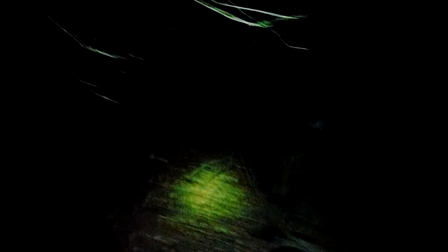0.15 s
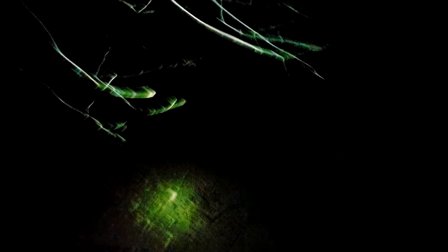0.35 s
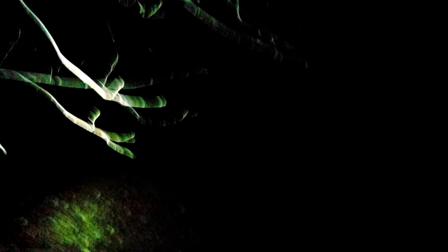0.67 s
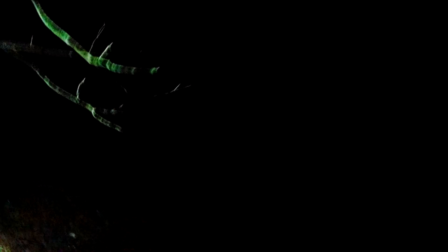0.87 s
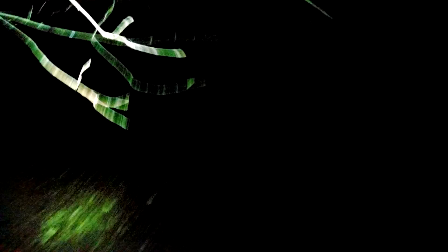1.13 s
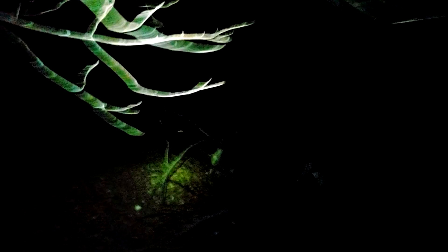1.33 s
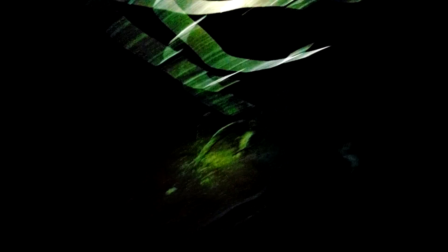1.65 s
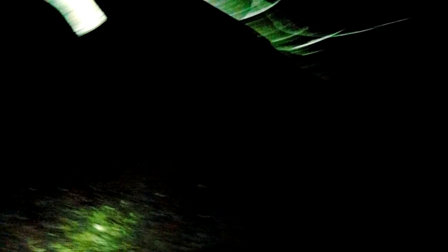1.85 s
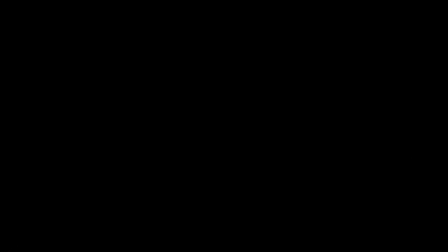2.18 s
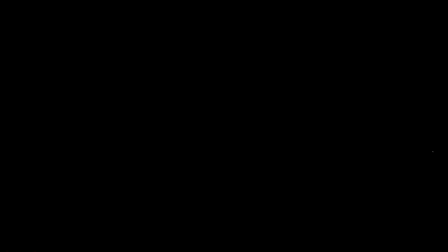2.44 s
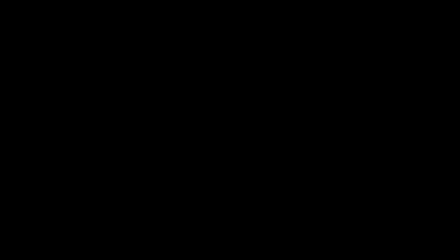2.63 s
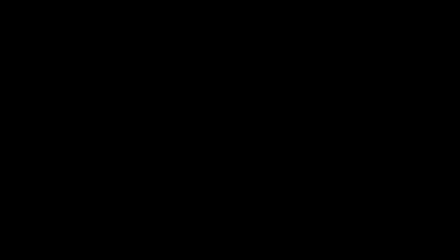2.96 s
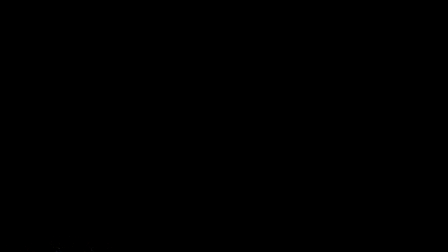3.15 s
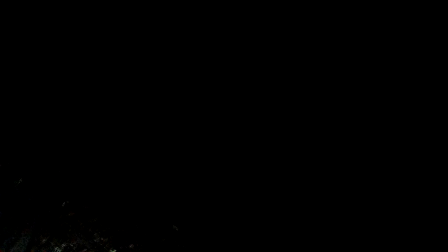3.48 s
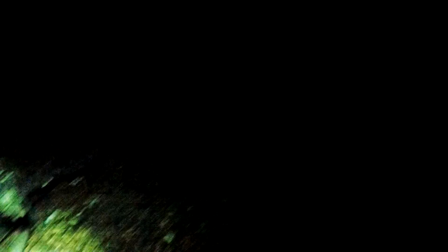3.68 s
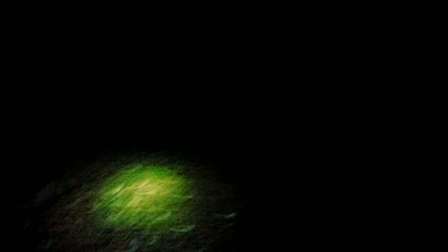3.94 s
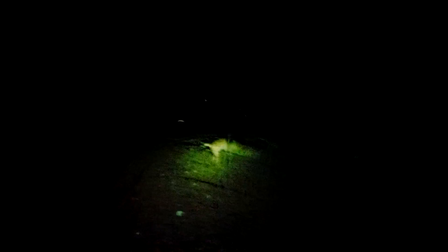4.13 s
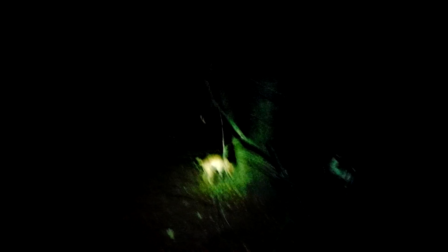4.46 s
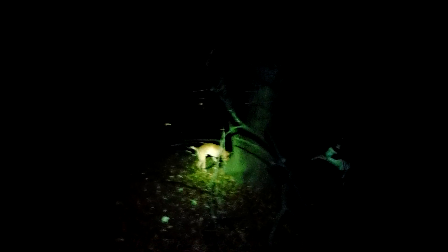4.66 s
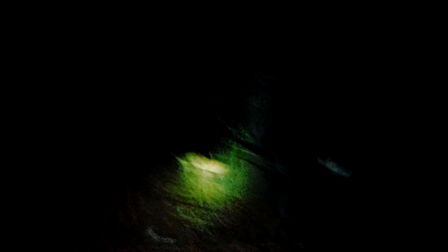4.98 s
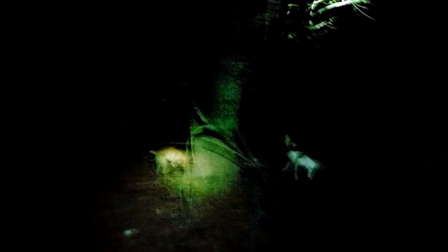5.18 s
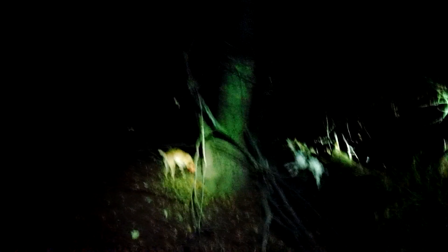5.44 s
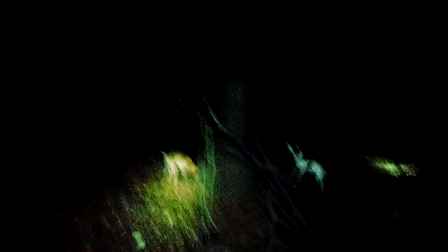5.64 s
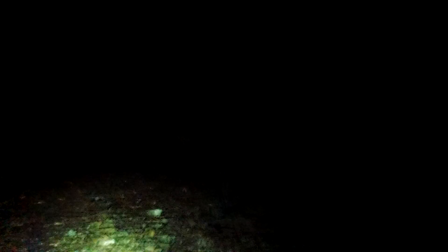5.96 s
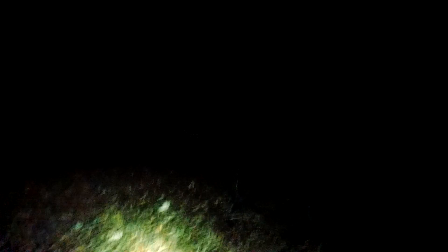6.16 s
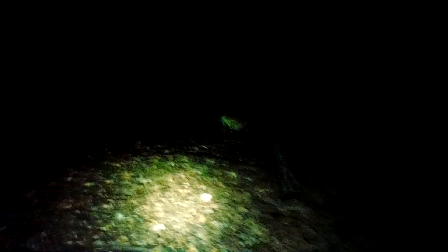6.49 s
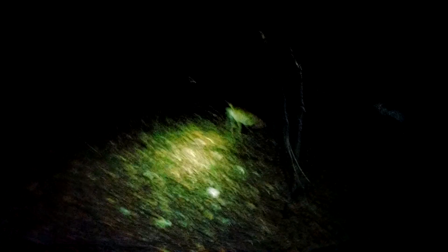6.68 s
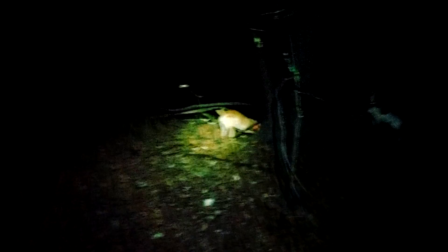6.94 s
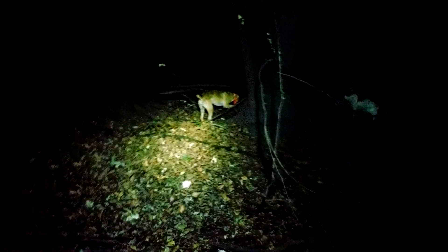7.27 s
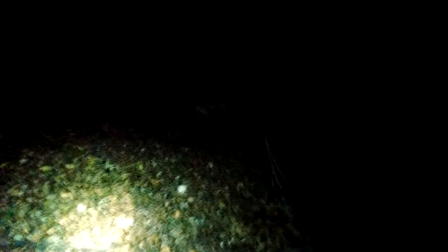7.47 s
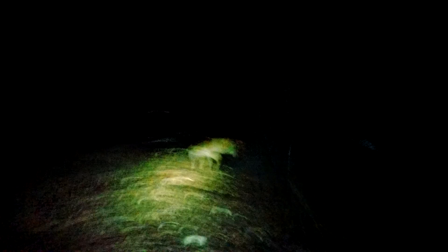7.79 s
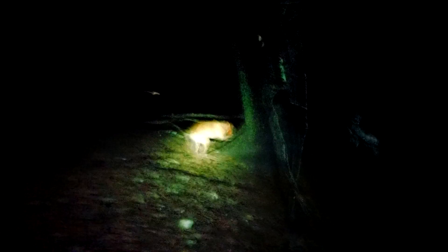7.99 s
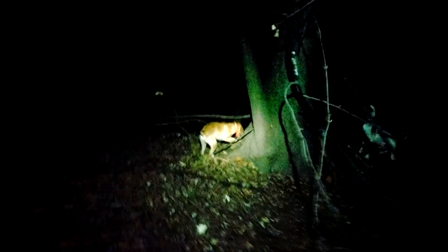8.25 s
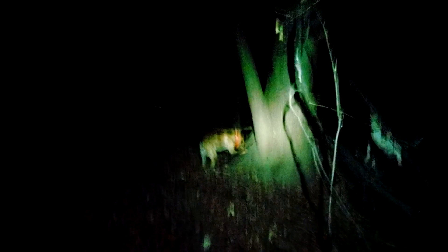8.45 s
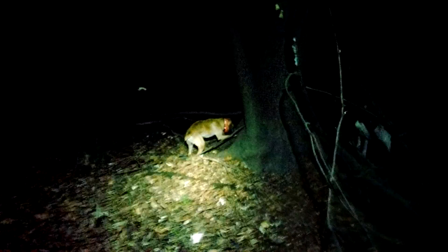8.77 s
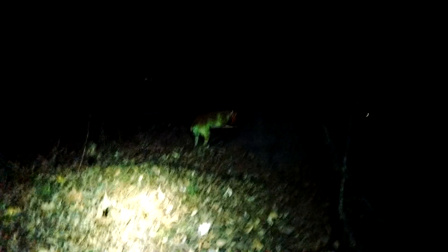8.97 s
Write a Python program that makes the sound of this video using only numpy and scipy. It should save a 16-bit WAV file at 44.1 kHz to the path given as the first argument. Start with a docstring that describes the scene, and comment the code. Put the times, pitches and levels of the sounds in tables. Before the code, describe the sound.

Rattling drawn-out dog howls and cracking yelps echo faintly among trees as close footsteps crunch dry leaves and twigs snap.

```python
"""Two hounds in a wood at night

Two hounds bay: hoarse barks, long throaty howls that break into a rattle at a third of the pitch, clear yelps.
The voices are sums of gliding partials plus breath noise; the trees echo them as a decaying noise tail.
Close by, whoever carries the two microphones wades through dry leaves (crackling noise). There are short clicks,
some of them twigs (a sharp noise burst over a duller knock). The moving microphones thud softly, and three tiny
squeaks sound among the leaves."""
import sys
import numpy as np
from scipy import signal
from scipy.fft import rfft, irfft, next_fast_len
from scipy.io import wavfile
from scipy.ndimage import map_coordinates

SR = 44100
rng = np.random.default_rng(int(sys.argv[2]) if len(sys.argv) > 2 else 0)


def int16_out(signal):
    """Quantize to a 16-bit WAV file."""
    q = np.round(np.clip(np.atleast_2d(signal).T, -1, 1) * 32767)
    wavfile.write(sys.argv[1], SR, q.astype(np.int16))


N = 402191  # samples

# Hoarse barks. Each row: start in [s], length in [s], loudest moment as a share of the length, pitch at start
# and at end in [Hz], level in [dB], fall after the loudest moment in [dB], upper band over the lower in [dB],
# mouth resonance in [Hz], rattle at the start in [dB].
BARK_ROWS = [(0.0, 0.11, 0.053, 332.7, 380, 3.5, 31, -8.5, 675, 4),
             (.783, 0.24, 0.17, 386.5, 302.5, -12, 9.8, -3, 600, 0),
             (1.381, 0.22, 0.2, 330.8, 361, -11.5, 16, -5, 646, 1),
             (3.027, .2, 0.5, 378.3, 335, -13.5, 11, -1.5, 525, -1),
             (7.548, 0.22, 0.36, 354.8, 339.5, -9, 11, -4, 760, 5.5),
             (9.03, 0.16, 0.087, 391, 313, -9, 4.6, -3, 585, 2)]
# Long howls, one list each. Each row: time in [s], pitch in [Hz], level under about 1 kHz in [dB], upper band
# over the lower in [dB], mouth resonance in [Hz], rattle at a third of the pitch in [dB], roughness [0-1].
HOWL_TRACKS = [
    [(1.77, 310.2, -14.5, -13, 600, -12, 0.7), (1.888, 299, -14.5, -11, 620, -11, 0.8),
     (2.074, 339.6, -12.5, -14, 660, -17, 0.5), (2.16, 345.5, -26.5, -15, 700, -4, 0.4),
     (2.25, 350.2, -23, -12, 800, 2.5, 0.57), (2.3, 360.5, -25.5, -7, 490, -7, 0.56),
     (2.36, 365, -23.5, -17.5, 470, 5, 0.22), (2.44, 359.7, -22, -14.5, 470, 0.5, 0.56),
     (2.55, 351, -26.5, -7, 480, -9, 0.6), (2.59, 343, -26, -8.5, 690, -2, 0.8),
     (2.63, 341.6, -27, -12, 643, 7, 0.62), (2.69, 338, -10, -13, 533, 15, 0.4)],
    [(3.22, 253.6, -33.5, -21, 510, 10, 0.7), (3.418, 273.3, -20, -18.5, 575, -31.5, 0),
     (3.532, 305.2, -25, -1, 835, -15, 0.1), (3.6, 312, -16.5, -3.5, 745, -7.5, 0.38),
     (3.74, 342, -11.5, -14.5, 620, -5, 0.85), (3.77, 348.3, -8, -18.5, 510, 0, 0),
     (3.88, 365, -10.5, -10, 454, -4, 0.35), (3.954, 353.3, -17.5, -1.5, 790, -8.5, 0.65),
     (4.0, 313, -36, -27, 495, 35.5, 0.9)],
    [(4.35, 359.6, -10, -8, 691, -5, 0.8), (4.375, 354, -19, 1, 705, 18.5, 0.8),
     (4.39, 340.7, -5.5, -12.5, 745, -17, 0.4), (4.402, 349.6, -13, -15.5, 740, -8.5, 0.44),
     (4.5, 314, -15.5, -13, 620, -1.5, 0.7), (4.6, 306.8, -18, -12.5, 603, -15, 0.37),
     (4.69, 297.6, -20.5, -11, 666, -20.5, 0.7), (4.714, 302, -16, -12.5, 627, -5, 0.7),
     (4.74, 292, -20.5, -12.5, 680, -37, 0.65), (4.858, 289.6, -15.5, -16.5, 730, -36, 0.23),
     (4.94, 287.3, -14, -24, 841, -40, 0), (5.04, 296.7, -17.5, -8.5, 840, -30, 0.3),
     (5.08, 318, -14, -11.5, 650, -3, 0.74), (5.196, 333.3, -12.5, -11, 720, -5, 0.8),
     (5.3, 338.7, -13, -10, 716, 0, 0.65), (5.4, 337.6, -12, -9.5, 753, 0.5, 0.8),
     (5.52, 346.7, -15.5, -6.5, 777.7, -11, 0.76), (5.628, 353.3, -11.5, -4.5, 760, 6.5, 0.8),
     (5.67, 345.2, -9, -12, 672.6, -8, 0.83), (5.683, 338.2, -23, -2.5, 600, 10, 0.9),
     (5.7, 330.3, -8, -10.5, 573, 14, 0.87), (5.745, 318, 3, -5, 594, 0, 1)],
    [(6.108, 352, -16.5, -3, 670, 2, 0.6), (6.16, 357.2, -16.5, -1, 700, 3.5, 0.8),
     (6.23, 344.2, -14.5, -10.5, 650, 3.5, 0.45), (6.332, 341.3, -16, -13, 600, 4, 0.7),
     (6.436, 336.5, -14, -10.5, 700, 9, 0.78), (6.65, 341, -12, -14.5, 650, 4, 0.72),
     (6.78, 342.8, -12.5, -14.5, 674, 3.5, 0.6), (6.9, 341.8, -14.5, -9.5, 670, 3, 0.56),
     (6.98, 340.8, -12.5, -9, 658, 6.5, 0.38), (7.07, 335.7, -11, -7, 646, 5, 0.79),
     (7.12, 347.6, -13, -9, 650, 7, 0.77), (7.165, 374.7, -23, 0, 510, 0.5, 0.33),
     (7.2, 364, -32, 6, 518, 7, .7)],
]
# Lowest voice partial, howl by howl, in [dB], before the rattle shifts it.
HOWL_FUNDAMENTAL_DB = [-7.5, -5, -2, 0.5]
# Colour of the throat. Each row: frequency in [Hz], gain in [dB].
THROAT_GAIN = [(100, -53.5), (250, -14.5), (330, -4.5), (490, -1), (620, -3.5), (790, 1), (930, -8.5),
               (1080, -3), (1270, -3.5), (1470, -11), (1700, -12.5), (1900, -19.5), (2300, -37)]
# Resonances rung by the breath; the first two form the lower band. Each row: centre in [Hz], width in [Hz],
# gain within its band in [dB].
BREATH_RESONANCES = [(510, 37.6, 0.5), (800, 150, -2.5), (1095, 170, -2), (1478, 100, -3),
                     (1780, 100, -9.5)]
# Echo among the trunks. Each row: frequency in [Hz], time to die by 60 dB in [s].
WOOD_DECAY = [(200, 1.3), (700, 1.32), (1500, 0.76), (3000, 7.6)]
# The dogs between the two microphones. Each row: frequency in [Hz], left minus right in [dB].
DOG_BALANCE = [(250, -4.5), (550, -4.5), (900, -3), (1600, 4.5)]
# Faint rustle between strides. Each row: time in [s], level in [dB] before the balance of the microphones.
STIR_LEVEL = [(0, -39.5), (1, -38.5), (4.2, -41.5), (4.6, -46.5), (4.9, -37), (6.4, -41.5), (7.4, -44.5),
              (8.55, -43.5), (8.94, -51.5), (9.12, -43.5)]
# Strides through the leaves. Each row: start in [s], length in [s], level in [dB] before the balance of the
# microphones, sag by the end in [dB] (negative grows).
STRIDE_ROWS = [(0.073, 0.15, -23.5, 1.5), (0.155, 0.5, -20, 18), (0.546, 0.3, -36, -8),
               (0.99, 0.2, -25.5, 20), (1.17, 0.38, -25, 15.5), (1.859, 0.31, -19, 9.5),
               (2.505, 0.25, -30.5, 7.5), (2.816, 0.11, -21, 23.5), (3.04, 0.13, -29.5, 15),
               (3.175, 0.31, -33.5, 13), (3.317, 0.22, -22.5, 16), (3.5, 0.11, -28, 9),
               (3.914, 0.28, -22, 12), (4.812, 0.061, -29, 3), (4.894, 0.24, -16.5, 15),
               (5.35, 0.31, -33.5, 15), (5.725, 0.82, -31, 27), (5.931, 0.21, -28, -1.5),
               (6.526, 0.36, -26, 12.5), (7.473, 0.27, -30.5, 12.5), (7.718, 0.16, -23.5, 15),
               (7.883, 0.13, -35.5, -1), (8.12, 0.061, -31, -1), (8.19, 0.033, -29, 10),
               (8.248, 0.092, -20, 20), (8.319, 0.27, -23.5, 16), (8.983, 0.23, -32, 6)]
# Relative spectrum of the close, crisp rustle. Each row: frequency in [Hz], density in [dB per Hz].
CRISP_SPECTRUM = [(40, -22.5), (150, -35), (400, -10), (1500, -7.5), (2600, -3.5), (4000, -5.5),
                  (8000, -7.5), (11500, -2), (15000, -4.5)]
# Relative spectrum of the rustle alike on both sides. Each row: frequency in [Hz], density in [dB per Hz].
SHARED_SPECTRUM = [(40, -16.5), (200, -6), (500, 2.5), (1500, -2.5), (2500, -33), (4000, -9.5), (7000, -3),
                   (15000, -23)]
# Thuds of the handled microphones. Each row: time in [s], rumble in [dB] before its wobble and side gains.
HANDLING_LEVEL = [(0.0, -57), (1.04, -60), (6.168, -56.5), (6.249, -66), (7.699, -61.5), (8.5, -63),
                  (8.89, -78), (9.12, -51)]
# Short clicks, some of them twigs. Each row: time in [s], nominal level of the sharp burst in [dB], knock
# relative to it in [dB] before filtering.
CLICK_ROWS = [(0.235, -5, -29), (0.5837, -8.5, -10), (0.958, -20, -17), (1.021, -13, -26),
              (1.102, -16, -25), (2.094, 5, -30), (2.1276, 3.5, -27), (2.148, 1.5, -34), (2.783, -17, -19),
              (3.1804, -18.5, -17), (3.214, -13, -25), (3.423, -5.5, -13), (4.1846, -8, -32),
              (4.8313, -23, -17), (5.386, -12.5, -11), (5.4066, -25, 6), (5.664, -17.5, -18),
              (6.659, -6.5, -26), (7.099, -17.5, -20), (7.47, -19, -6), (7.9033, -37, 13),
              (7.9483, -17, -3), (8.03, -17.5, -11), (8.137, -21, -5), (8.204, -27.5, 8.5),
              (8.267, -8.5, -11), (8.275, -14, -5), (8.293, -20, -8), (8.36, -12.5, -25), (8.4158, 6, -35),
              (8.4726, -29, 4), (8.51, -8.5, -21), (8.544, -11.5, -8), (8.7784, -27.5, 0),
              (8.86, -40.5, 12), (8.941, -41, 4), (8.981, -21.5, 2), (9.0117, -18, -3)]
# Clear yelps. Each row: loudest moment in [s], rise in [s], fall in [s], pitch at start, loudest moment and end
# in [Hz], level of the first partial in [dB], swell in [dB], fade in [dB], second and third partial over the
# first in [dB], depth of the hoarse flutter in [dB].
YELP_ROWS = [(.785, 0.049, 0.029, 346, 628.5, 550, -5, 43, 17, -8.5, -29, -24),
             (1.375, 0.031, 0.1, 378, 414.7, 360, -20.5, 6, 4.9, 2, -11, -33),
             (1.62, 0.12, 0.091, 351.7, 366, 393, -30, 14, 2.4, 2, 0, -11.5),
             (1.766, 0.095, 0.053, 379, 466.6, 457, -13.5, 11, 12, -18, -11.5, -20),
             (2.0, 0.054, 0.027, 333, 429.7, 433, -23, 8.6, 6, 7.5, 2, -28),
             (2.045, .03, 0.052, 430.6, 428, 350, -14.5, 8, 33, -8, -4.5, -29),
             (2.645, .03, 0.019, 581, 517, 493, -18, 28, 23, 0, -31, -18),
             (2.889, 0.043, 0.07, 337, 417, 368, -30, 15, 15, 13, -18.5, -15.5),
             (2.965, 0.026, 0.027, 408, 450, 450, -22.5, 12, 32, -19, -34, -13),
             (3.045, 0.056, 0.013, 415, 650, 680, -13.5, 26, 17, 2, -32, -8),
             (3.519, 0.066, 0.068, 371, 446.4, 330, -23, 13, 11, 9.5, -10, -18),
             (3.958, 0.032, 0.042, 465, 448, 300, -16, 14, 31, -10.5, -17.5, -9.5),
             (4.316, 0.053, 0.048, 346, 433, 409, -21.5, 12.7, 3.7, 6.5, 0, -17),
             (4.385, 0.038, 0.019, 430, 553.4, 600, -15, 7.3, 22, 0.5, -22.5, -10),
             (5.757, .022, 0.022, 643, 617, 517, -20.5, 5.1, 15, 1, -13, -7),
             (6.108, 0.048, 0.02, 416, 585, 640, -7.5, 27, 6.9, 5, -18, -16),
             (7.158, 0.041, 0.033, 575, 546, 380, -12, 21, 21, -7, -50, -10.5),
             (7.2, .02, 0.039, 215, 178, 95, -51, 8, 10, -26.5, -45.5, -8),
             (7.552, 0.021, 0.018, 506, 537, 650, -7.5, 21, 13, -4, -16.5, -20),
             (7.752, 0.019, 0.036, 588, 490, 395, -13, 9.3, 21, -7, -11, -12),
             (9.025, 0.036, 0.034, 767, 675, 542, -10, 22, 11, -22, -26, -19)]
# Lines between the partials of a cracked yelp: the lower and the upper, in multiples of the pitch.
CRACK_RATIOS = (1.6, 2.5)
# Tiny squeaks among the leaves. Each row: time in [s], peak in [dB].
SQUEAKS = [(8.04, -37.5), (8.27, -33), (8.75, -47)]

BAND_SPLIT_HZ = 1050  # between the lower and upper band of a voice
UPPER_MOUTH = 4.48  # second mouth resonance, in multiples of the pitch
FUNDAMENTAL_PER_DB = 0.14  # dB on the lowest voice partial per dB of rattle
UPPER_RATTLE_DB = -5  # the rattle is weaker in the upper band
DOUBLING = .12  # extra strength of every other rattle in a rough voice
HOARSE_SHARE = .45  # share of power that is breath in the roughest, rattling voice
BARK_SWELL_DB, BARK_SWELL_BEND = 32, 2.2  # swell if it took a whole length, and its curve
BARK_FALL_BEND, BARK_RELEASE_DB = 0.45, 3  # the fall is quick at first; breath gives out late
BARK_DULLS_DB, BARK_RATTLE_LOSS_DB = 10.5, 7  # upper band and rattle lost by the end
BARK_ROUGH, BARK_CLEARS = 1, 0.46  # roughness at the start (0-1), share of it lost by the end
BARK_FUNDAMENTAL_DB = 0.5
STRIDE_RISE_S, STRIDE_STOP_S = 0.068, 0.045
BIGGEST_CRACK = 6.5  # leaf crack, in steps of the cracks' dB spread
APART_DB = -14.5  # rustle that differs on the two microphones
PORT_LAG_S = 17.3 / SR  # close rustle reaches the left microphone this much later
FOURTH_DB = -6.5  # fourth yelp partial against the second, before the throat
GLIDE_BEND, SWELL_BEND, FADE_BEND = 1.6, 1.5, 1.96  # curves of arched pitch and level
CRACK_RISING_HZ, CRACK_FALLING_HZ = 510, 650  # a gliding yelp cracks above, or below, this pitch
CRACK_DB = -7  # the lower line between the partials
CHIRP_HZ, CHIRP_S = 3200, .006  # pitch, and time from the peak to 1/e
TOP_HZ = 15700  # band limit


def amp(db):
    """Gain of a level in dB."""
    return 10 ** (np.asarray(db) / 20)


def unit(x):
    """x at an RMS of one."""
    return x / np.sqrt(np.mean(x ** 2) + 1e-20)


def along(points, hz):
    """Value at hz between (Hz, value) points on a log axis."""
    f, v = np.transpose(points)
    return np.interp(np.log(hz + 1), np.log(f + 1), v)


def wobble(rate, size, count=1):
    """Smooth random curves of size samples, rate knots a second."""
    knots = rng.standard_normal((count, int(size * rate / SR) + 4))
    return np.array([map_coordinates(k, [np.arange(size) * rate / SR], order=2) for k in knots])


def filtered(x, response):
    """x times a complex response of frequency."""
    m = next_fast_len(N + SR // 2)
    return irfft(rfft(x, m) * response(np.fft.rfftfreq(m, 1 / SR)), m)[..., :N]


def call(rows, rise, fall):
    """Start sample, times, soft ends and the interpolated columns of one call."""
    s, *cols = np.transpose(rows)
    start = round(s[0] * SR)
    t = np.arange(start, min(round(s[-1] * SR), N)) / SR
    ends = np.clip(np.minimum((t - s[0]) / rise, (s[-1] - t) / fall), 0, 1)
    return start, t, ends ** 2, [np.interp(t, s, c) for c in cols]


def barks():
    """A bark bursts out, dies away fast at first, and grows duller and less rough, in the columns of a howl."""
    tracks = []
    u = np.linspace(0, 1, 15)  # share of the length
    for s, length, top, hz0, hz1, db, loss_db, upper_db, mouth_hz, rattle_db in BARK_ROWS:
        swell_db = BARK_SWELL_DB * np.maximum(top - u, 0) ** BARK_SWELL_BEND
        fall_db = loss_db * np.maximum((u - top) / (1 - top), 0) ** BARK_FALL_BEND
        tracks.append(np.column_stack([
            s + u * length,
            hz0 + (hz1 - hz0) * u ** 3,
            db - swell_db - fall_db - BARK_RELEASE_DB * u ** 5,
            upper_db - BARK_DULLS_DB * u,
            np.full(len(u), mouth_hz),
            rattle_db - BARK_RATTLE_LOSS_DB * u,
            BARK_ROUGH * (1 - BARK_CLEARS * u),
            np.full(len(u), BARK_FUNDAMENTAL_DB)]))
    return tracks


def howls():
    """A howl's lowest voice partial is weaker while the folds do not rattle; it is added as a last column."""
    return [[(*row, db + FUNDAMENTAL_PER_DB * row[-2]) for row in rows]
            for rows, db in zip(HOWL_TRACKS, HOWL_FUNDAMENTAL_DB)]


def breath(gains):
    """Noise rings the throat's resonances in a lower and an upper band, each on its own gain."""
    def rings(hz):
        parts = BREATH_RESONANCES[:2], BREATH_RESONANCES[2:]
        return np.array([sum(amp(db) / (1 + ((hz - centre) * 2 / width) ** 2) for centre, width, db in part)
                         for part in parts])

    low, high = filtered(rng.standard_normal((2, N)), rings)
    return unit(low) * gains[0] + unit(high) * gains[1]


def bays():
    """Partials of a third of the pitch: every third is the voice, the others rise when the folds rattle."""
    out, gains = np.zeros(N), np.zeros((2, N))
    k = np.arange(1, 21)[:, None]
    voice, fundamental = k % 3 == 0, k == 3
    for rows in barks() + howls():
        start, t, ends, columns = call(rows, rise=.02, fall=.05)
        pitch, db, upper_db, first_hz, rattle_db, roughness, low_db = columns
        rough, second_hz = np.clip(roughness, 0, 1), UPPER_MOUTH * pitch
        jitter = (.002 + .006 * rough) * wobble(45, len(t))[0] + .006 * wobble(18, len(t))[0]
        hz = k * pitch / 3 * (1 + jitter)
        low = hz < BAND_SPLIT_HZ

        size_db = along(THROAT_GAIN, hz) + ~voice * (rattle_db + UPPER_RATTLE_DB * ~low)
        size_db = size_db - 22 * (k < 3) + low_db * fundamental
        # the throat never holds still
        size_db = size_db + np.where(fundamental, 2, 4.5) * np.tanh(wobble(16, len(t), count=20))
        first_ring = 3 / (1 + ((hz - first_hz) / 85) ** 2)
        second_ring = 3 / (1 + ((hz - second_hz) / 130) ** 2)
        size = amp(size_db) * (1 + first_ring + second_ring)
        low_rms = np.sqrt(np.sum(low * size ** 2, axis=0) / 2)
        high_rms = np.sqrt(np.sum(~low * size ** 2, axis=0) / 2)
        size = np.where(low, size / low_rms, size / high_rms * amp(upper_db))

        # uneven cycles smear the rattle and the high partials most; the fundamental stays steady
        smear = rough * np.where(fundamental, .05, np.where(voice, .4, .75)) * (hz / 650) ** .3
        shake, sway = 1.5 * np.tanh(wobble(90, len(t), count=40) / 1.5).reshape(2, 20, -1)
        # partials lag around each resonance, and each drifts loosely in phase
        lag = np.arctan((hz - first_hz) / 200) + np.arctan((hz - second_hz) / 250)
        lag = lag + 1.6 * wobble(4, len(t), count=20)
        turn = 2 * np.pi * np.cumsum(hz, axis=1) / SR - lag
        # in a rough voice every other rattle is stronger, now more, now less
        doubling = DOUBLING * rough * (1 + np.tanh(wobble(6, len(t))[0]))
        puffs = 1 + doubling * np.cos(turn[0] / 2 - hz / 160)
        size = size * np.where(fundamental, 1, puffs)
        wave = amp(4.5 * smear * shake) * np.sin(turn + 1.5 * smear * sway)

        noisy = HOARSE_SHARE * rough ** 3 * np.clip(amp(rattle_db), 0, 1)  # share of power
        level = amp(db) * ends
        out[start:][:len(t)] += level * np.sqrt(1 - noisy) * np.sum(size * wave, axis=0)
        gains[:, start:][:, :len(t)] += level * np.sqrt(noisy) * amp([0 * t, upper_db])
    return out + breath(gains)


def wood(x):
    """Trunks scatter the voices into a late noise tail; each frequency dies at its own speed."""
    hz, t, z = signal.stft(rng.standard_normal((2, SR)), SR, nperseg=256)
    decay_db = -60 * t / along(WOOD_DECAY, hz)[:, None]
    z = z * amp(decay_db + 1.6 * rng.standard_normal(len(t)))
    tail = signal.istft(z, SR, nperseg=256)[1]
    tail[1] = 0.75 * tail[0] + 0.73 * tail[1]  # the two sides are partly alike
    late = np.pad(x, (1500, 0))[None]  # samples before the first echo
    return signal.fftconvolve(late, tail / np.linalg.norm(tail[0]), axes=1)[:, :N]


def wading():
    """Gain of the rustle: each stride swells, sags and stops over the faint stir."""
    t = np.arange(N) / SR
    power = amp(np.interp(t, *np.transpose(STIR_LEVEL))) ** 2
    for s, length, db, sag_db in STRIDE_ROWS:
        ends = np.clip(np.minimum((t - s) / STRIDE_RISE_S, (s + length - t) / STRIDE_STOP_S), 0, 1)
        stride = ends * amp(db - sag_db * np.clip((t - s) / length, 0, 1))
        power = power + stride ** 2
    return np.sqrt(power)


def crackle(density, spread_db):
    """Noise roughened by tiny leaf cracks, density of them a second, each dying over a few milliseconds."""
    sizes = amp(spread_db * np.minimum(rng.exponential(1, N), BIGGEST_CRACK))
    cracks = (rng.random(N) < density / SR) * sizes
    swell = signal.lfilter([1], [1, -np.exp(-1 / (0.002 * SR))], cracks)
    drift_db = (1.5 * wobble(40, N) + 1.5 * wobble(12, N))[0]
    return unit(rng.standard_normal(N) * (3 + swell) * amp(drift_db))


def crisp():
    """Close leaf crackle with its bright spectrum, at an RMS of one."""
    return unit(filtered(crackle(250, 4), lambda hz: amp(along(CRISP_SPECTRUM, hz))))


def leaves():
    """Close rustle and sharp clicks come inverted and early on the right; dull rustle and knocks alike on both."""
    level = wading()
    sharp, knock = clicks()
    near = level * crisp() + sharp
    dull = unit(filtered(crackle(150, 3.3), lambda hz: amp(along(SHARED_SPECTRUM, hz))))
    both = level * amp(-8.5) * dull + knock
    late = filtered(near, lambda hz: np.exp(-2j * np.pi * hz * PORT_LAG_S))
    apart = np.array([crisp(), crisp()])
    return amp([[.5], [1.5]]) * np.array([late, -near]) + amp(APART_DB) * level * apart + both


def rumble():
    """The moving microphones thud softly: low noise, mostly in opposite sense on the two of them."""
    level = amp(np.interp(np.arange(N) / SR, *np.transpose(HANDLING_LEVEL)) + 7.7 * wobble(18, N)[0])
    corner_hz = np.array([[150], [90]])  # shared part, opposed part
    noise = filtered(rng.standard_normal((2, N)), lambda hz: hz / (hz + 25) / (1 + (hz / corner_hz) ** 3))
    mid, side = level * unit(noise)
    return np.array([amp(-13) * mid + amp(3) * side, amp(-12) * mid - amp(5) * side])


def clicks():
    """Short clicks, some of them twigs: a sharp noise burst of a few milliseconds over a longer, duller knock."""
    sharp, knock = np.zeros(N + SR), np.zeros(N + SR)
    t = np.arange(SR // 20) / SR
    for s, db, body_db in CLICK_ROWS:
        start = round(s * SR)
        burst, body = rng.standard_normal((2, len(t)))
        sharp[start:][:len(t)] += amp(db - 6 - 60 * t / 0.0086) * burst
        knock[start:][:len(t)] += amp(db + body_db - 60 * t / 0.052) * body
    return sharp[:N], filtered(knock[:N], lambda hz: 1 / (1 + (hz / 2000) ** 4) / (1 + (300 / (hz + 1)) ** 4))


def yelps():
    """A tight, clear voice of four partials on a gliding pitch; they flutter a little and the voice may crack."""
    out = np.zeros(N)
    for s, rise_s, fall_s, hz0, hz1, hz2, db, swell_db, fade_db, second_db, third_db, hoarse_db in YELP_ROWS:
        # away runs from -1 at the start through 0 at the loudest moment to 1 at the end
        start, t, ends, (away,) = call([(s - rise_s, -1), (s, 0), (s + fall_s, 1)], rise=.009, fall=.01)
        rising, distance = away < 0, np.abs(away)
        bend = GLIDE_BEND if hz1 > max(hz0, hz2) else 1
        pitch = hz1 + (np.where(rising, hz0, hz2) - hz1) * distance ** bend
        drop_db = np.where(rising, swell_db, fade_db) * distance ** np.where(rising, SWELL_BEND, FADE_BEND)

        # the fourth partial follows the second until the throat cuts it off
        fourth_db = second_db + FOURTH_DB + along(THROAT_GAIN, 4 * pitch)
        turn = 2 * np.pi * np.cumsum(pitch * (1 + .008 * wobble(60, len(t))[0])) / SR
        flutter_db = np.array([[2], [3], [4], [5]]) * wobble(45, len(t), count=4)
        first = amp(flutter_db[0]) * np.sqrt(2) * np.sin(turn)
        upper = sum(amp(partial_db + flutter_db[k]) * np.sqrt(2) * np.sin((k + 1) * turn + k)
                    for k, partial_db in enumerate([second_db, third_db, fourth_db], 1))

        # a cracked voice swings unevenly: lines between the partials replace most of the upper ones
        past_rising = (pitch - CRACK_RISING_HZ) * (hz2 > hz1 > hz0)
        past_falling = (CRACK_FALLING_HZ - pitch) * (hz2 < hz1 < hz0)
        crack = np.clip((past_rising + past_falling) / 40, 0, 1)
        low_line = amp(CRACK_DB + flutter_db[1]) * np.sin(CRACK_RATIOS[0] * turn + flutter_db[1] / 3)
        high_line = amp(CRACK_DB - 6 + flutter_db[3]) * np.sin(CRACK_RATIOS[1] * turn + flutter_db[2] / 3)
        tone = first + (1 - .85 * crack) * upper + crack * (low_line + high_line)

        hoarse = 1 + amp(hoarse_db) * wobble(300, len(t))[0]
        out[start:][:len(t)] += ends * amp(db - drop_db) * tone * hoarse
    return out


def chirps():
    """Short soft pips of one pitch, each under a bell-shaped swell."""
    t = np.arange(N) / SR
    tone = np.sin(2 * np.pi * CHIRP_HZ * t)
    return sum(amp(db) * np.exp(-((t - s) / CHIRP_S) ** 2) * tone for s, db in SQUEAKS)


def toward(dogs):
    """The dogs reach the left microphone 40 microseconds late, with a level balance that varies with pitch."""
    def half_each(hz):
        left_over_right = np.log(amp(along(DOG_BALANCE, hz))) - 2j * np.pi * hz * 4e-5
        return np.exp(left_over_right * [[.5], [-.5]])

    return filtered(dogs, half_each)


def scene():
    """Dogs and their echo among the trees, with leaves, clicks, squeaks and handling close by."""
    dogs = bays() + yelps()
    return toward(dogs) + amp(-15) * wood(dogs) + leaves() + chirps() + rumble()


def record(dry):
    """Loud peaks clip with a rounded knee; nothing is kept above the band limit."""
    clipped = dry / (1 + np.abs(dry) ** 12) ** (1 / 12)
    return np.clip(filtered(clipped, lambda hz: 1 / (1 + (hz / TOP_HZ) ** 200)), -1, 1)


dry = scene()
out = record(dry)
int16_out(out)
```